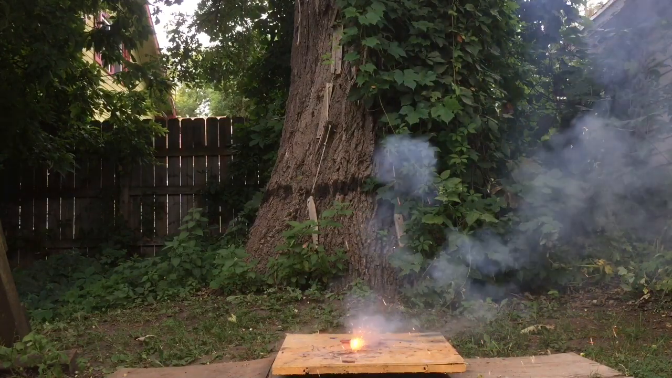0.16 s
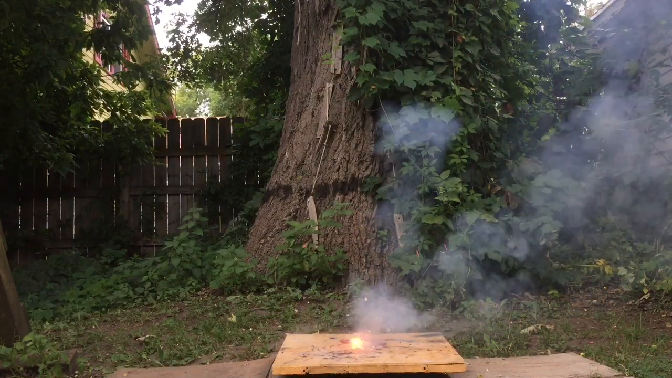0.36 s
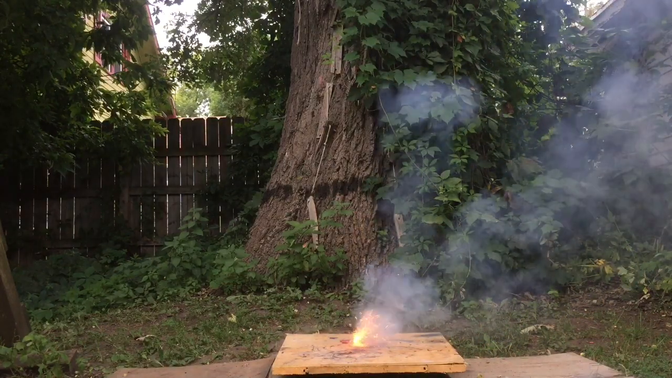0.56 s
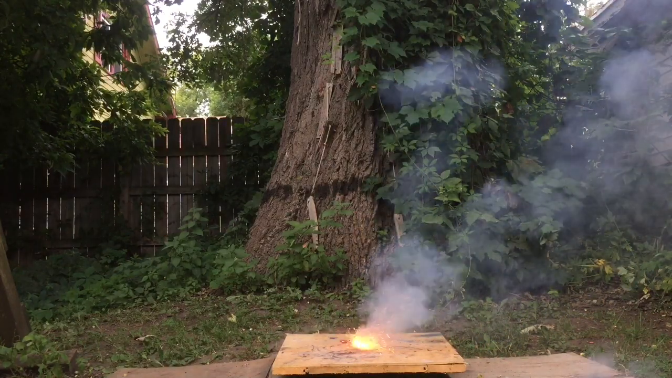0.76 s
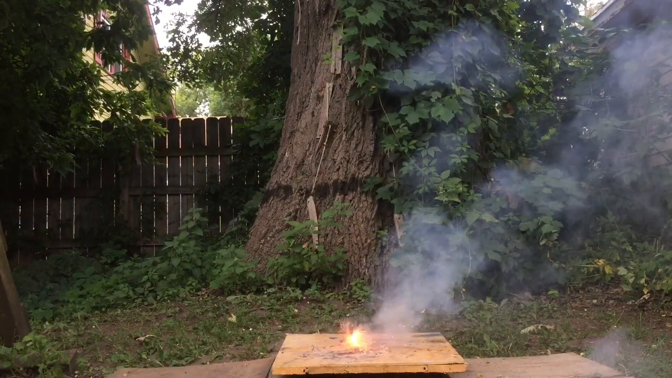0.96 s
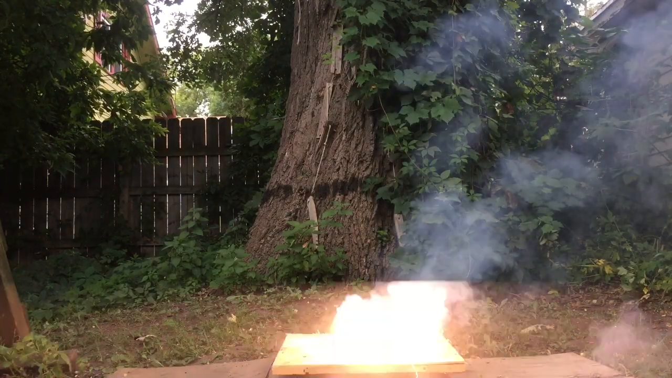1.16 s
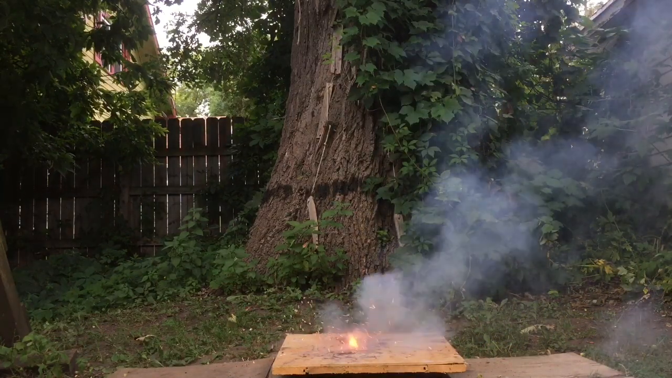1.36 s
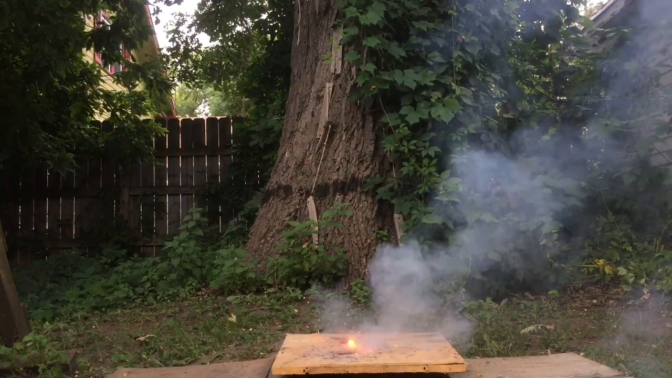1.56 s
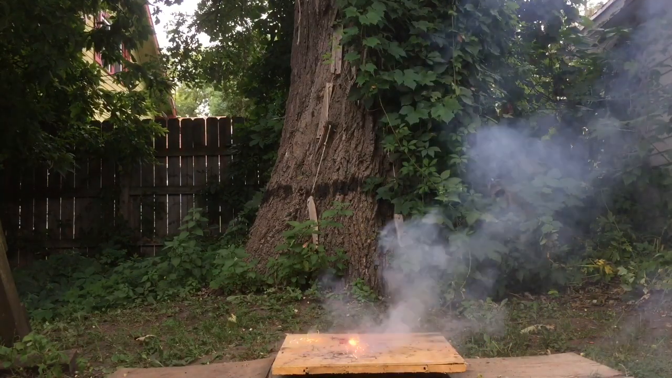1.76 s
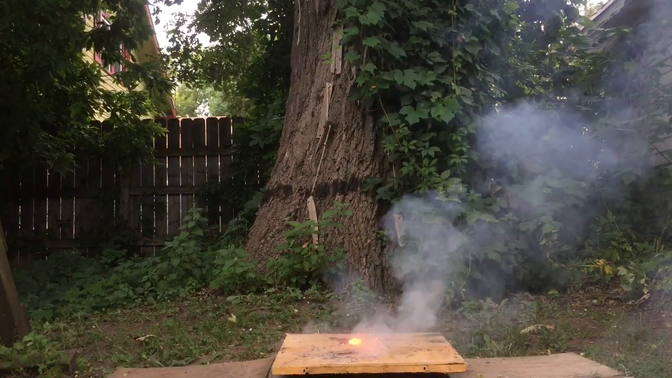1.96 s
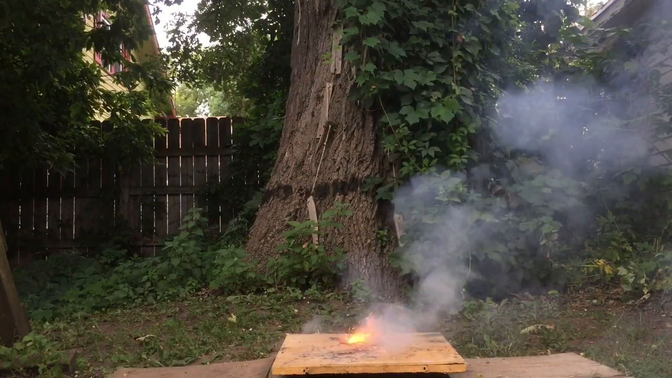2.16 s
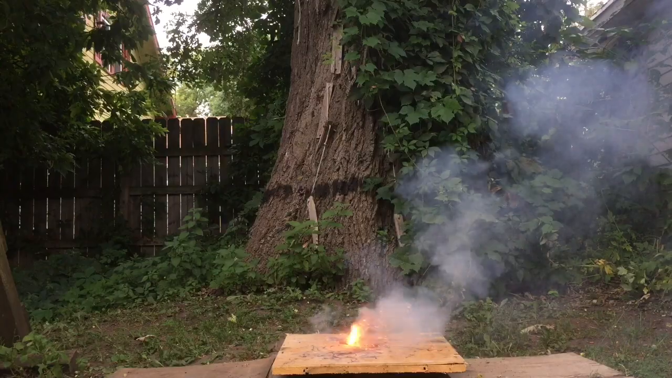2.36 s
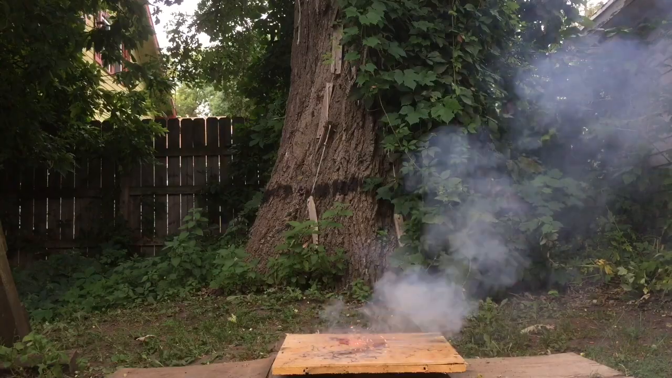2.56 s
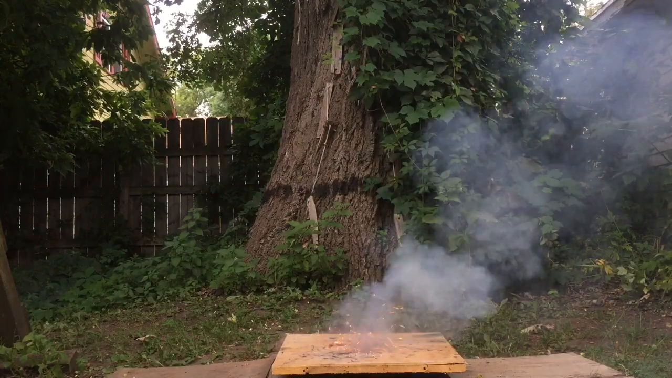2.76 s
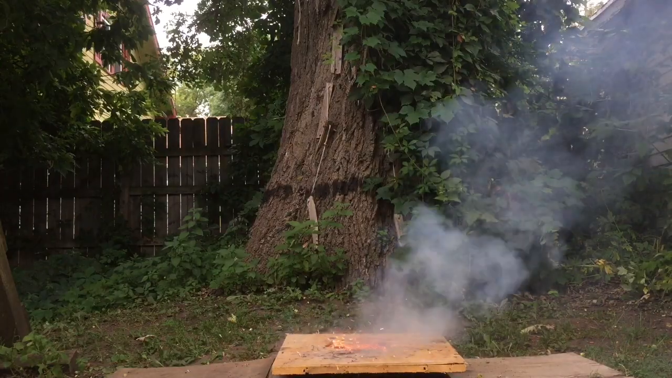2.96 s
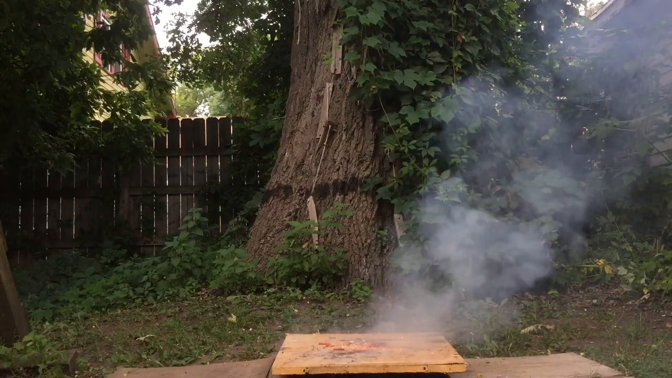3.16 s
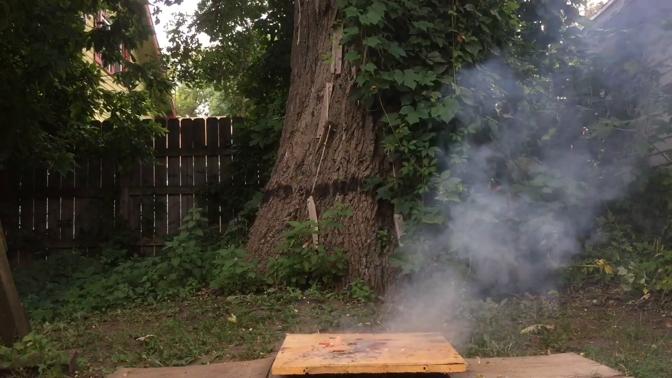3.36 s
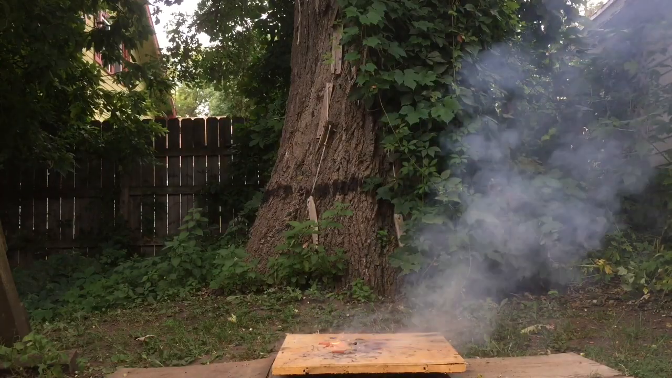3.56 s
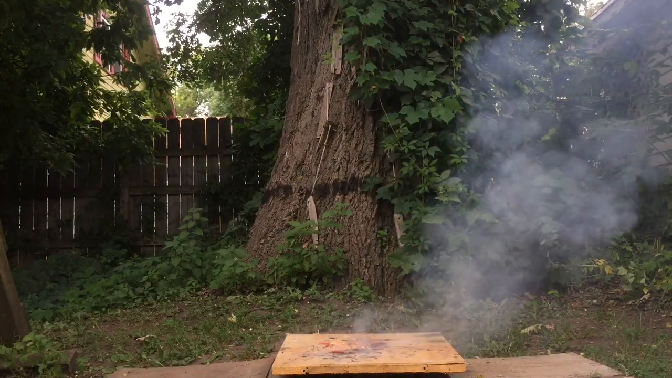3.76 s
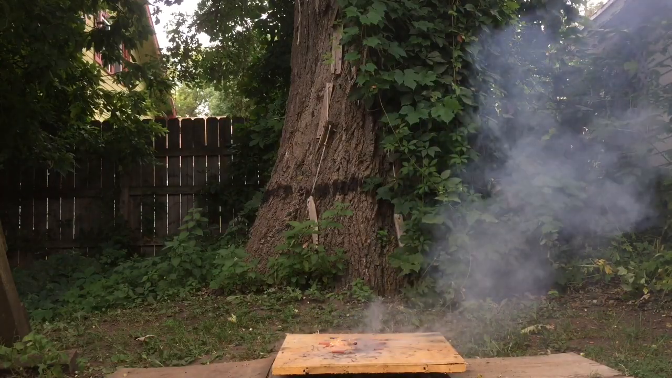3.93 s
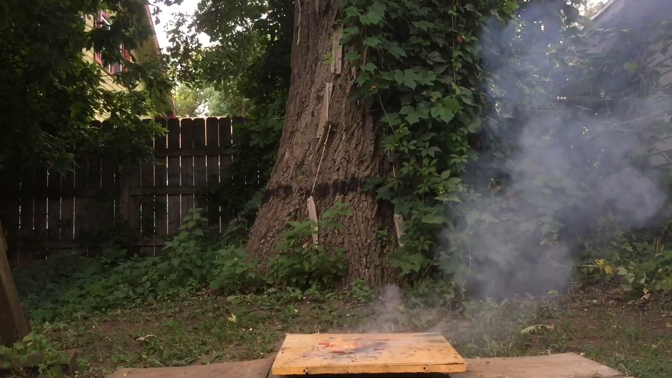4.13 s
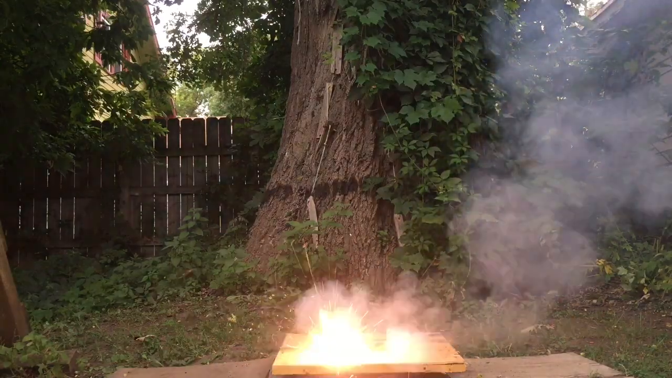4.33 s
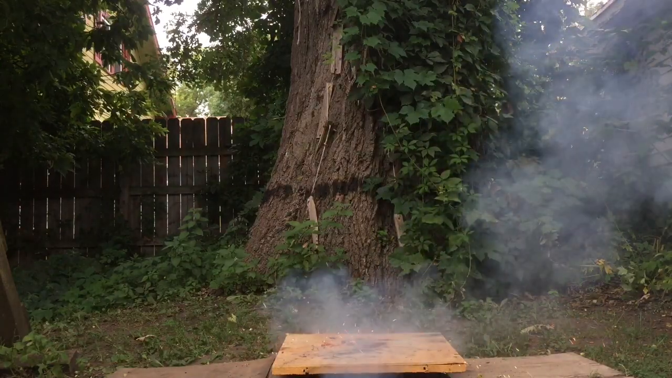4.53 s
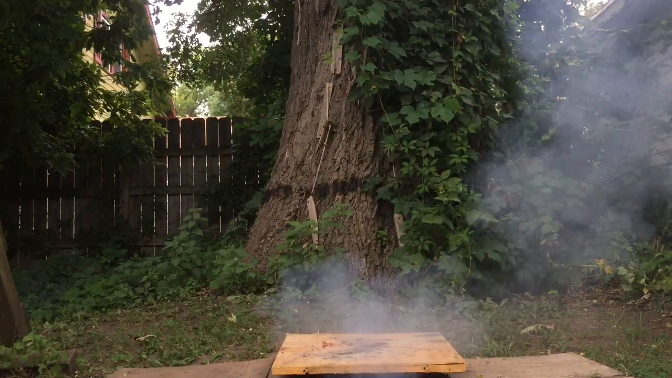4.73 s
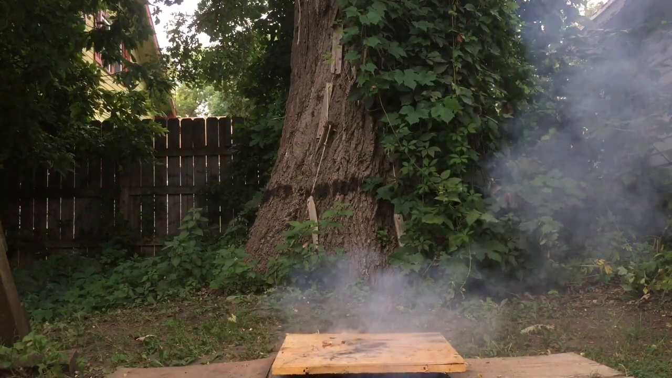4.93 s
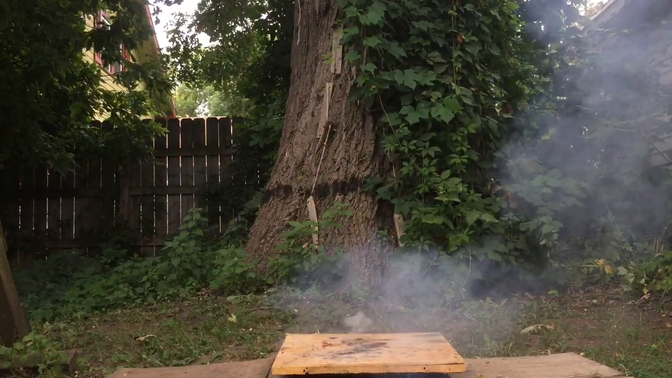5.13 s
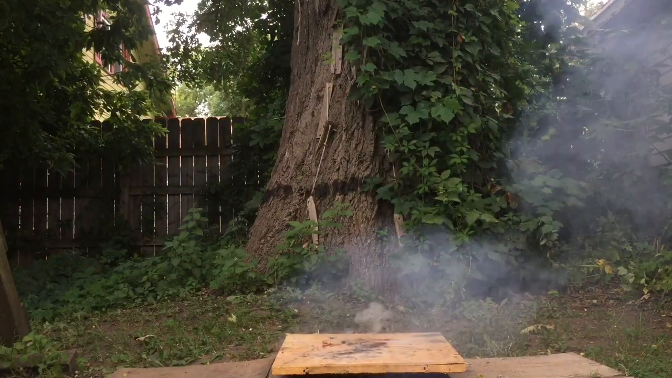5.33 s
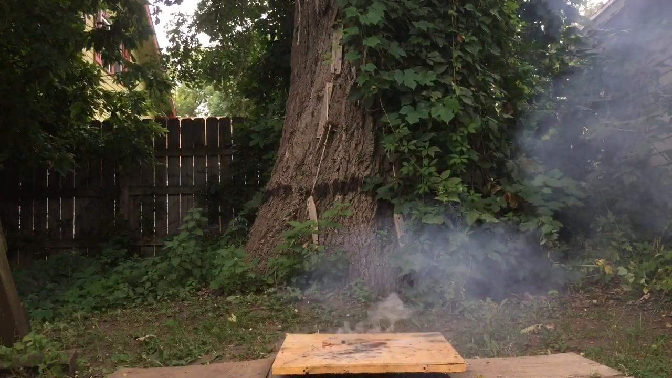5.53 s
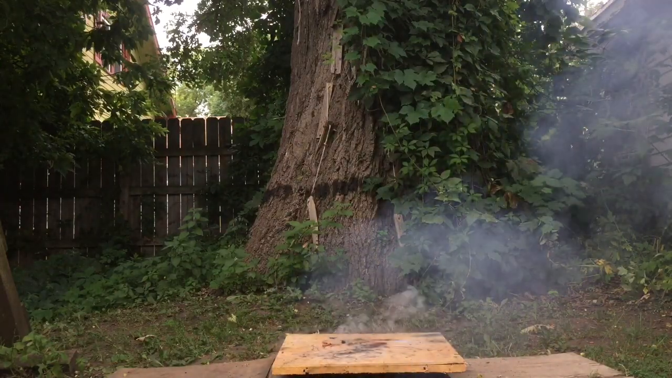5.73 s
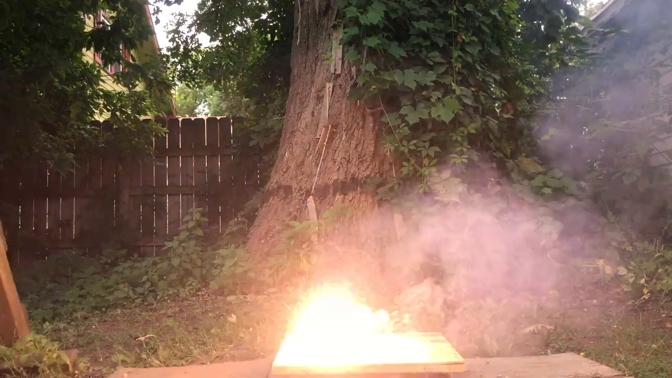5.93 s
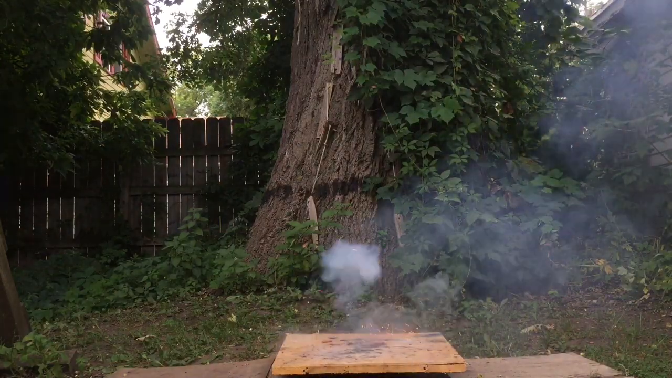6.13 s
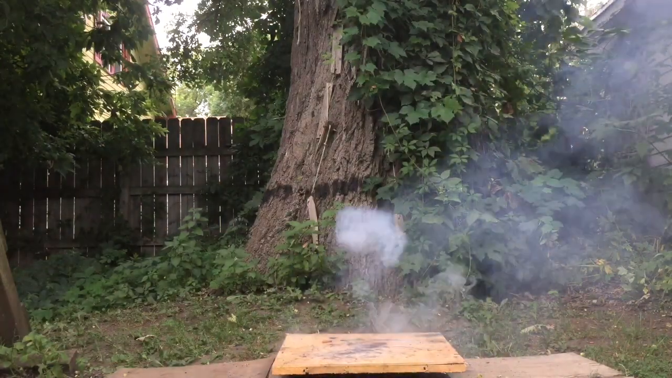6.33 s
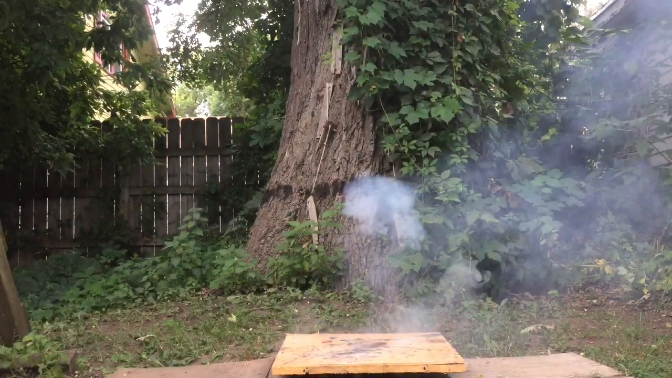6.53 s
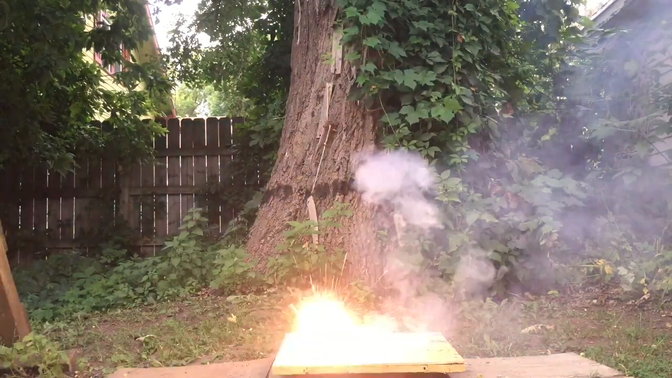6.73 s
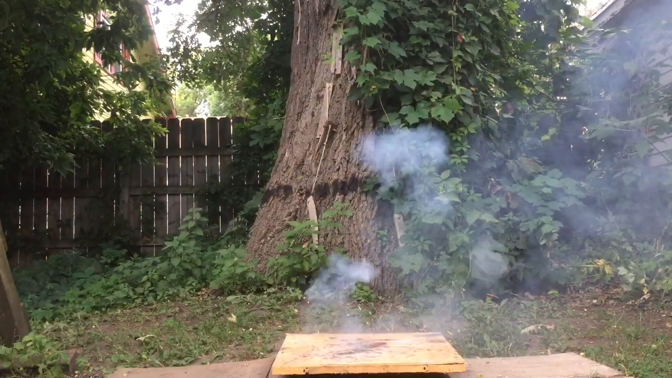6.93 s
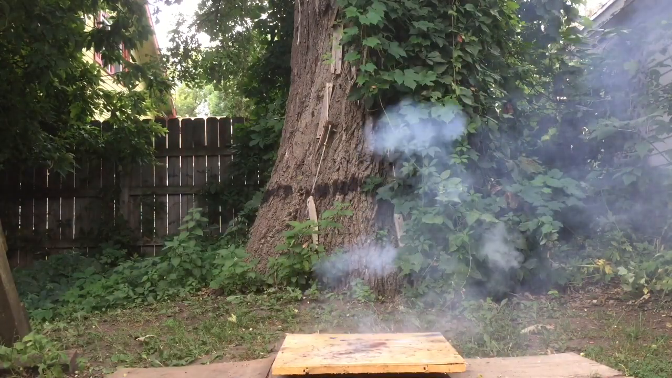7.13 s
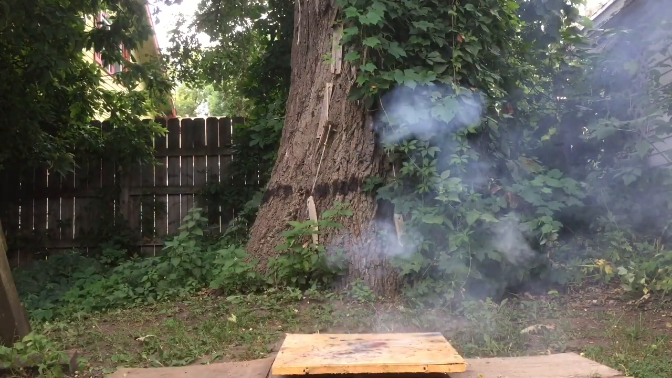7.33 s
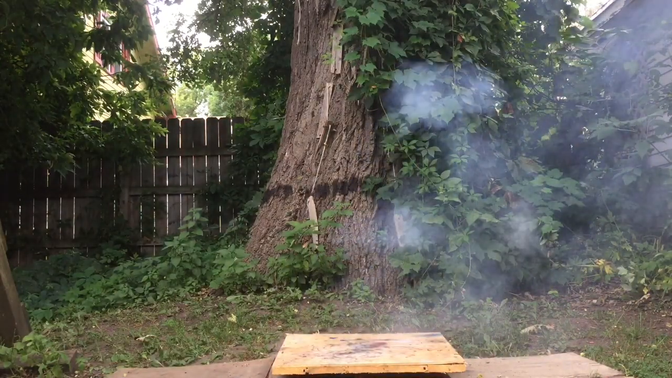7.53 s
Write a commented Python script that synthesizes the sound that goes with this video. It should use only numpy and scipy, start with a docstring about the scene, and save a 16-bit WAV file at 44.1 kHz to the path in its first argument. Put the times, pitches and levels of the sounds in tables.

```python
"""In a garden, a string of firecrackers bangs on a board close to a small camera.
Each bang is a pressure jump plus bursts of noise: fence and trunk scatter it, far houses answer
a third of a second later. Wind rumbles and the outdoors murmurs as coloured noise; the fuse spits.
The camera's gain shuts on loud sound and creeps back in the pauses; its input overloads."""
import sys
import numpy as np
from scipy import signal
from scipy.fft import rfft, irfft, next_fast_len
from scipy.io import wavfile
from scipy.ndimage import map_coordinates

SR = 44100
rng = np.random.default_rng(int(sys.argv[2]) if len(sys.argv) > 2 else 0)


def dump(signal):
    """Clip the signal to [-1, 1] and save it as 16-bit WAV at the path in sys.argv[1]."""
    limited = np.clip(np.atleast_2d(signal).T, -1, 1)
    pcm = np.round(limited * 32767).astype(np.int16)
    wavfile.write(sys.argv[1], SR, pcm)


N = 339129
LEAD = SR // 2  # samples of room for a bang that starts before time zero

# Wind and garden levels before the gain control: (time [s], wind level [dB], garden level [dB])
AIR_LEVELS = [(0, -59.5, -56), (1.2, -62.5, -55.5), (2.4, -59, -53), (3.9, -56.5, -55.5),
              (5.4, -58.5, -57.5), (6.7, -62.5, -55), (7.69, -58, -55)]
# Colour of the wind on the microphone: (frequency [Hz], relative level [dB per Hz])
WIND_COLOUR = [(15, -57), (28, -28.5), (45, -15), (60, -5), (87, -1), (200, -8.5), (300, -15), (600, -17),
               (800, -50.5), (1500, -120)]
# Colour of the outdoor hum: (frequency [Hz], relative level [dB per Hz])
GARDEN_COLOUR = [(210, -35.5), (350, -10), (470, -13), (590, -16), (710, -5), (1080, -0.5), (1330, -2),
                 (1780, -7.5), (3100, -19), (3800, -37), (7000, -45), (10400, -53), (13000, -46),
                 (16000, -57)]

# Colour of the fuse's flare: (frequency [Hz], relative level [dB per Hz])
FIZZ_COLOUR = [(2000, -30), (3300, 0), (4500, -9), (5400, -5), (6200, -15), (9000, -18), (10400, -24),
               (11300, -9), (14000, -10), (14600, -20), (15300, -10)]
# Small fuse pops: (time [s], level before the gain control [dB], time to fall 60 dB [s])
FUSE_POPS = [(4.261, -62, .004), (4.5635, -11, .008), (5.707, -64, .004), (6.764, -55, .008),
             (7.5648, -37, .003)]
# Colour of the fuse pops and of each blast's crack: (frequency [Hz], relative level [dB per Hz])
CRACK_COLOUR = [(200, 7), (1300, 9.5), (4000, -7.5), (7000, -10.5), (15000, -28)]
FLARE_S, FLARE_RISE_S, FLARE_T60_S, FLARE_DB = 2.33, .045, .9, -70  # peak time, swell, fade, level

# Levels of each bang's parts before the gain control: (time [s], blast [dB], thump [dB],
# foliage hiss [dB], house wall answer [dB], far answer [dB])
BANGS = [(-.237, 15.5, -8, -25.5, -32, -38.5), (.5360, 12, -13, -32, -26.5, -42),
         (1.3095, 13.5, -9, -30, -26, -38.5), (2.7453, 13.5, -9.5, -22, -26.5, -38),
         (2.9787, 10.5, -10.5, -30.5, -21.5, -41), (4.3095, 13.5, -5.5, -20.5, -26.5, -38),
         (4.4608, 9.5, -3, -30.5, -19, -40.5), (6.0658, 13, -8, -25, -29, -39),
         (6.8636, 10, -16, -30, -23.5, -42)]
# Strong single reflections of the blast: (delay [s], typical level against the direct sound [dB])
WALL_ECHOES = [(0.0099, -8), (0.016, -3), (0.024, -4.5)]
# Colour of the scattered blast: (frequency [Hz], relative level [dB per Hz])
SCATTER_COLOUR = [(59, -40.5), (100, -13.5), (368, -7), (541, -3.5), (628, -8.5), (714, -7), (1380, -1),
                  (2570, -13), (4780, -29.5), (8510, -32.5), (15100, -48), (16500, -60)]
# Fading off fence, trunk and ground: (frequency [Hz], time to fall 60 dB before stretching [s])
SCATTER_T60 = [(60, 0.11), (300, 0.23), (600, 0.24), (1300, 0.25), (4000, 0.34), (9000, 0.23),
               (15000, 0.074)]
SCATTER_STRETCH = 1.254  # factor on those fading times
# Low pressure swings, direct and reflected: (delay [s], typical level [dB])
PUSHES = [(.002, -4.5), (0.0149, -1)]
# Colour of the low push of the blast: (frequency [Hz], relative level [dB per Hz])
THUMP_COLOUR = [(25, -20.5), (60, -3), (125, 1.5), (210, -6.5), (350, -2.5), (600, -20)]
# Blunt reflection off the far fence, a single row:
# (delay [s], frequency [Hz], decay [s], typical level over the thump [dB])
FENCE_SLAP = (.0462, 329, 0.0047, -5.5)
# Colour of the treble scattered by foliage: (frequency [Hz], relative level [dB per Hz])
LEAVES_COLOUR = [(1500, -29.5), (3000, -5), (5000, 0), (8000, -2), (10400, -14), (12000, -11.5),
                 (15500, -20)]
# Fading of the foliage hiss: (frequency [Hz], time to fall 60 dB before stretching [s])
LEAVES_T60 = [(3000, 0.35), (6000, .56), (10000, 0.52), (15000, .4)]
# Colour of the house wall and far answers: (frequency [Hz], relative level [dB per Hz])
ANSWER_COLOUR = [(90, -55.5), (150, -19.5), (450, -15), (650, -11.5), (800, -5.5), (1280, 1), (2300, -6.5),
                 (3300, -19), (4800, -36.5), (8000, -48), (12000, -67.5)]
# Each answer: delay of its peak, swell time, time to fall 60 dB
HOUSE_S, HOUSE_RISE_S, HOUSE_T60_S = .09, .045, .24  # nearest house wall
FAR_S, FAR_RISE_S, FAR_T60_S = .32, .19, .8  # distant houses

# Gain control: after a loud sample it holds, then opens again
LOUD = .3  # sample size that counts as loud
HOLD_S, OPENS_DB_PER_S, OPEN_DB = .46, 22.5, 17.5  # wait, opening speed, upper limit
QUIET_BEFORE_S = .18  # quiet time assumed before the start
CLOSE_S, TREBLE_CLOSE_S = .04, .008  # smoothing times of the gain
# Each fall overshoots by a share of its size, deepest after DIP_S, then springs back
DIP_S, DIP_BACK_S, DIP_SHARE = .195, .031, .58
# The bass moves fully, the other bands by a share of the decibels
BASS_HZ, MID_SHARE, TREBLE_HZ, TREBLE_SHARE = 263, .24, 3700, .72
TOP_HZ = 16000  # middle of the treble cut-off


def amp(db):
    """Decibels to a plain multiplier."""
    return 10 ** (np.asarray(db) / 20)


def unit(x):
    """Scale a sound to an rms of 1."""
    return x / np.sqrt(np.mean(x ** 2) + 1e-20)


def along(points, hz):
    """Read values between (frequency, value) points on a log frequency axis."""
    f, v = np.transpose(points)
    return np.interp(np.log(hz + 1), np.log(f + 1), v)


def curves(rows):
    """One value per sample for each column after the time."""
    s, *columns = np.transpose(rows)
    return [np.interp(np.arange(N) / SR, s, column) for column in columns]


def wobble(rate, count=N):
    """A smooth random curve through this many random points a second."""
    knots = rng.standard_normal(int(count * rate / SR) + 4)
    return map_coordinates(knots, [np.arange(count) * rate / SR])


def filtered(x, response):
    """Multiply the spectrum of x by a response of frequency, with padding against wrap-around."""
    m = next_fast_len(x.shape[-1] + 8192)
    spectrum = rfft(x, m) * response(np.fft.rfftfreq(m, 1 / SR))
    return irfft(spectrum, m)[..., :x.shape[-1]]


def noise(colour, count=N):
    """Random noise shaped to a colour, with an rms of 1."""
    return unit(filtered(rng.standard_normal(count), lambda hz: amp(along(colour, hz))))


def fading(colour, t60, t, stretch):
    """Noise in which each frequency dies at its own speed."""
    hz, frames, z = signal.stft(noise(colour, count=len(t)), SR, nperseg=256)
    fade_s = stretch * along(t60, hz)[:, None]
    return signal.istft(z * amp(-60 * frames / fade_s), SR, nperseg=256)[1][:len(t)]


def delayed(pulse, echoes):
    """Later copies of a pulse, each varied at random in strength."""
    out = np.zeros(len(pulse))
    for lag, db in echoes:
        start = round(lag * SR)
        out[start:] += amp(db + rng.normal(0, 2.2)) * pulse[:len(pulse) - start]
    return out


def air():
    """Lumpy wind noise on the microphone and the gently varying hum of the neighbourhood."""
    wind_db, garden_db = curves(AIR_LEVELS)
    wind = amp(wind_db) * unit(amp(1.8 * wobble(23)) * noise(WIND_COLOUR))
    garden = amp(garden_db + 1.3 * wobble(16)) * noise(GARDEN_COLOUR)
    return wind + garden


def fuse():
    """The fuse flares once in thin noise, sizzles out, and gives short noise pops."""
    since = np.arange(N) / SR - FLARE_S
    swell = np.exp(-(since / FLARE_RISE_S) ** 2)
    fade = amp(-60 * np.abs(since) / FLARE_T60_S)
    flare = np.where(since < 0, swell, fade)
    out = amp(FLARE_DB + 1.4 * wobble(83)) * flare * noise(FIZZ_COLOUR)
    t = np.arange(SR // 20) / SR
    for s, db, t60 in FUSE_POPS:
        out[round(s * SR):][:len(t)] += amp(db - 60 * t / t60) * noise(CRACK_COLOUR, count=len(t))
    return out


def answer(t, delay, rise, t60):
    """Many distant surfaces: the answer swells to its peak, then fades."""
    swell = np.exp(-((t - delay) / rise) ** 2)
    fade = amp(-60 * (t - delay) / t60)
    shape = np.where(t < delay, swell, fade)
    uneven = amp(1.8 * wobble(160, count=len(t)))
    return noise(ANSWER_COLOUR, count=len(t)) * shape * uneven


def swing(t):
    """One low pressure swing: a quick dip, a slower rebound, a weak last trough."""
    lobe = lambda at, width: np.exp(-((t - at) / width) ** 2)
    return -lobe(.0025, .0014) + .78 * lobe(.0068, .0032) - .26 * lobe(.0145, .0045)


def low_thump(t):
    """The low push of the blast: pressure swings, a blunt fence reflection and a puff of low noise."""
    lag, slap_hz, decay, slap_db = FENCE_SLAP
    ring = -np.sin(2 * np.pi * slap_hz * t) * np.exp(-t / decay)
    slap = delayed(ring, [(lag, slap_db)])
    puff = .1 * noise(THUMP_COLOUR, count=len(t)) * (t / .02) * np.exp(1 - t / .023)
    return delayed(swing(t), PUSHES) + slap + puff


def scatter(t, stretch):
    """A dense burst off the board and ground, then crackling reflections that die band by band."""
    burst = 1 + 2.2 * np.exp(-(t / .022) ** 3)
    uneven = amp(1.9 * wobble(220, count=len(t)))
    onset = 1 - np.exp(-t / .001)
    return .11 * fading(SCATTER_COLOUR, SCATTER_T60, t, stretch) * burst * uneven * onset


def shock(t):
    """The pressure jump and its suction phase, ringing in the microphone port, with a ragged crack."""
    u = t / .0002
    jump = (1 - u) * np.exp(-u)
    # the port favours sound around 1150 Hz
    port = lambda hz: 1j * hz * 450 / (1150 ** 2 - hz * hz + 1j * hz * 450)
    crack = np.exp(-t / .0013) * noise(CRACK_COLOUR, count=len(t))
    return 4 * filtered(jump, port) + .46 * crack


def bangs():
    """Every cracker adds its shock, reflections, scatter, low thump, foliage hiss and house answers."""
    out, t = np.zeros(LEAD + N + SR), np.arange(SR) / SR
    for s, blast_db, thump_db, hiss_db, house_db, far_db in BANGS:
        front = shock(t)
        blast = front + delayed(front, WALL_ECHOES) + scatter(t, SCATTER_STRETCH)
        hiss = fading(LEAVES_COLOUR, LEAVES_T60, t, .92)
        house = answer(t, HOUSE_S, HOUSE_RISE_S, HOUSE_T60_S)
        far = answer(t, FAR_S, FAR_RISE_S, FAR_T60_S)
        bang = amp(blast_db) * blast + amp(thump_db) * low_thump(t)
        bang += amp(hiss_db) * hiss + amp(house_db) * house + amp(far_db) * far
        out[LEAD + round(s * SR):][:SR] += bang
    return out[LEAD:LEAD + N]


def gain_control(x):
    """Loud sound shuts the gain; quiet lets it creep open, most in the bass."""
    t = np.arange(N) / SR
    last_loud = np.maximum.accumulate(np.where(np.abs(x) > LOUD, t, -QUIET_BEFORE_S))
    wanted_db = np.clip(OPENS_DB_PER_S * (t - last_loud - HOLD_S), 0, OPEN_DB)
    # the real gain follows the wanted one a little late
    lagging = lambda lag_s: filtered(wanted_db, lambda hz: 1 / (1 + 2j * np.pi * hz * lag_s) ** 2)
    open_db = lagging(CLOSE_S)
    treble_open_db = lagging(TREBLE_CLOSE_S)

    falls = np.maximum(-np.diff(wanted_db, prepend=0), 0)
    deepen = (t / DIP_S) ** 2.2
    spring_back = np.exp(-((t - DIP_S) / DIP_BACK_S) ** 2)
    overshoot = np.where(t < DIP_S, deepen, spring_back)[:SR]
    dip_db = -DIP_SHARE * signal.fftconvolve(falls, overshoot)[:N]

    bass = filtered(x, lambda hz: 1 / (1 + 1j * hz / BASS_HZ) ** 2)
    treble = filtered(x, lambda hz: hz ** 8 / (hz ** 8 + TREBLE_HZ ** 8))
    mid = x - bass - treble
    opened = amp(open_db) * bass + amp(MID_SHARE * open_db) * mid
    opened += amp(TREBLE_SHARE * treble_open_db) * treble
    return amp(dip_db) * opened


def scene():
    """Add the air, the fuse and the bangs into one channel."""
    return (air() + fuse() + bangs())[None]


def record(dry):
    """The gain control acts, the overloaded input flattens the peaks, then the top treble is cut."""
    x = gain_control(dry[0])[None]
    flattened = x / (1 + np.abs(x) ** 16) ** (1 / 16) * .985
    treble_cut = lambda hz: amp(-36 / (1 + np.exp((TOP_HZ - hz) / 120)))
    return filtered(flattened, treble_cut)


dry = scene()
out = record(dry)
dump(out)
```